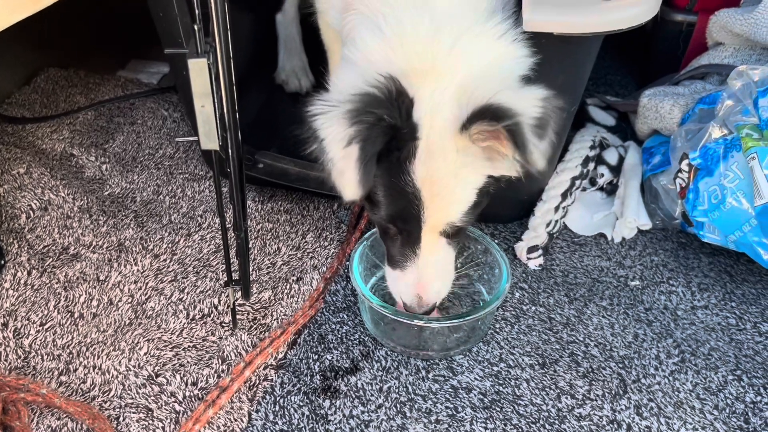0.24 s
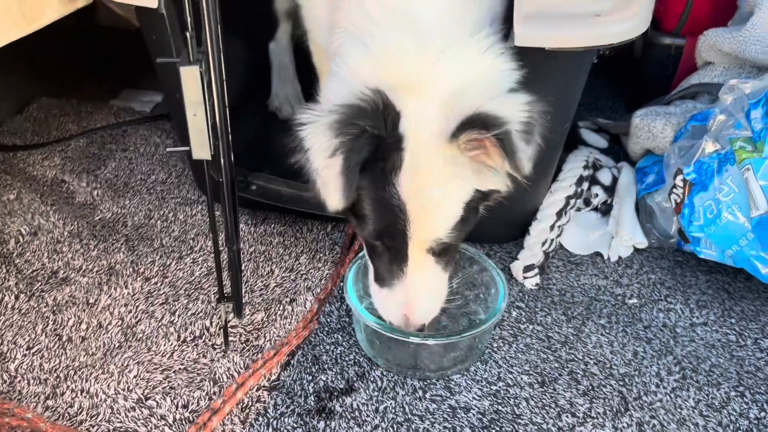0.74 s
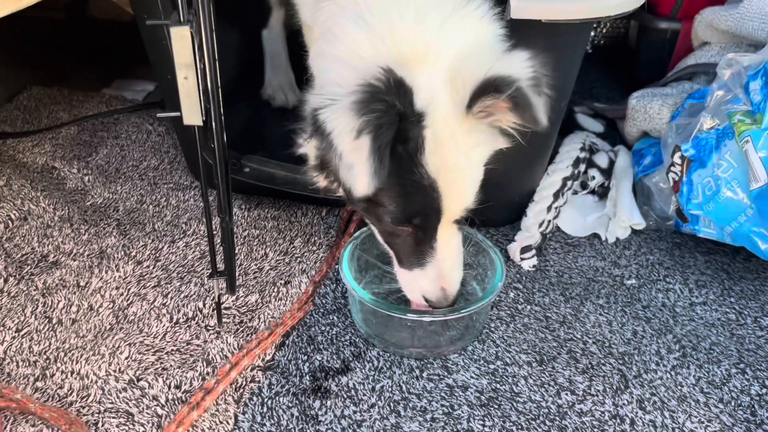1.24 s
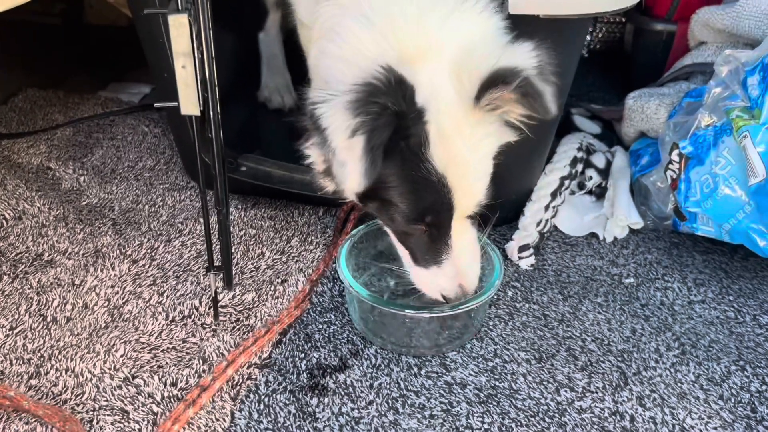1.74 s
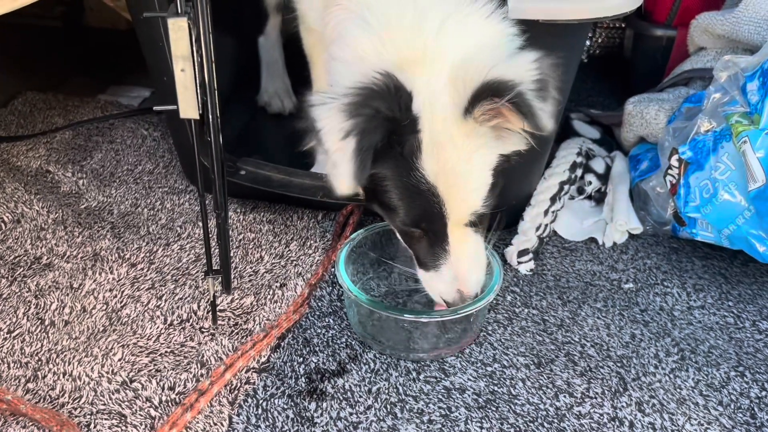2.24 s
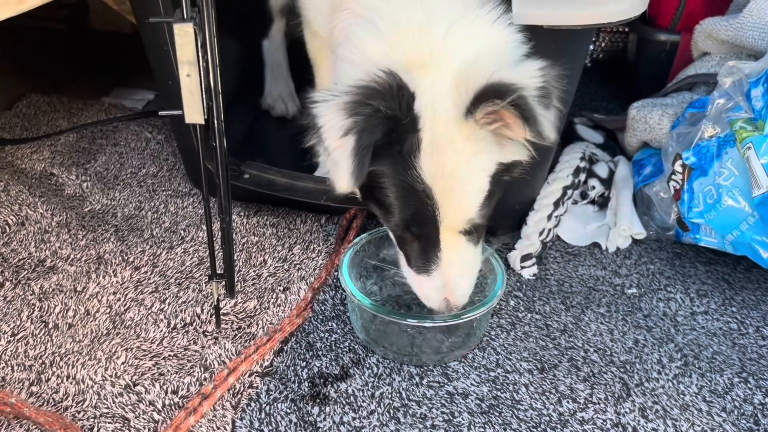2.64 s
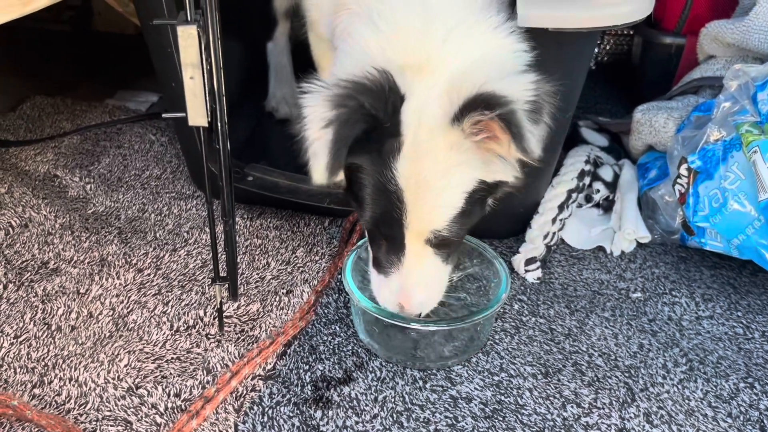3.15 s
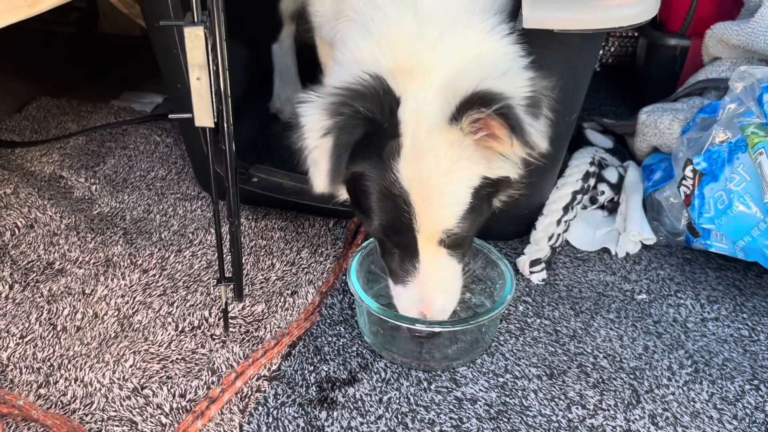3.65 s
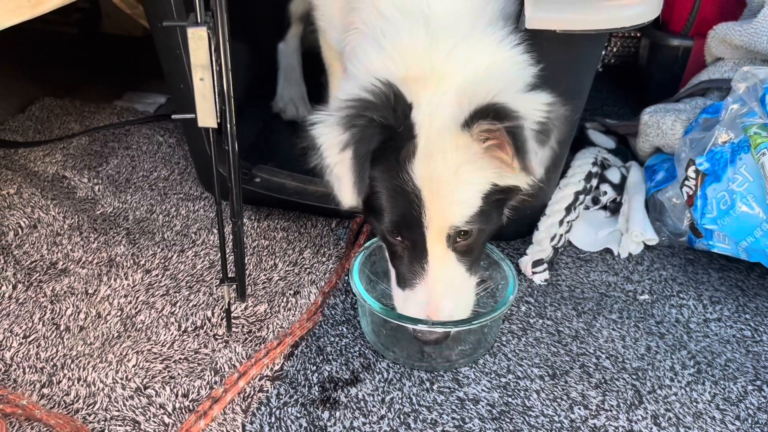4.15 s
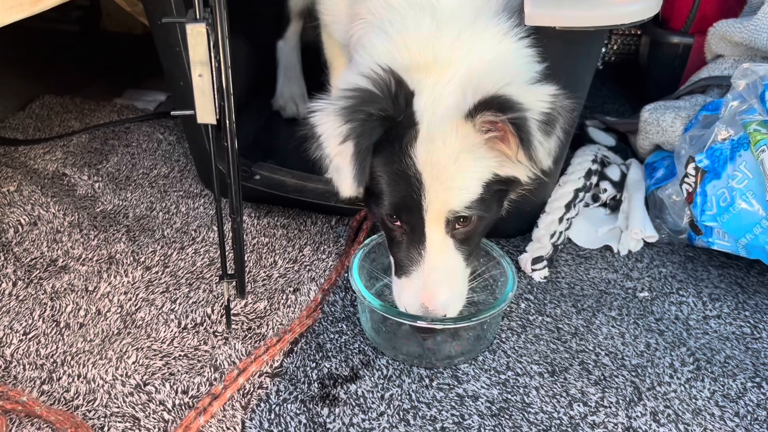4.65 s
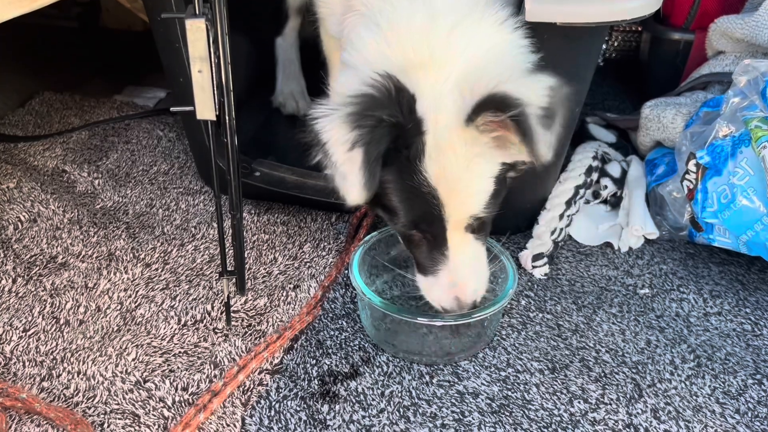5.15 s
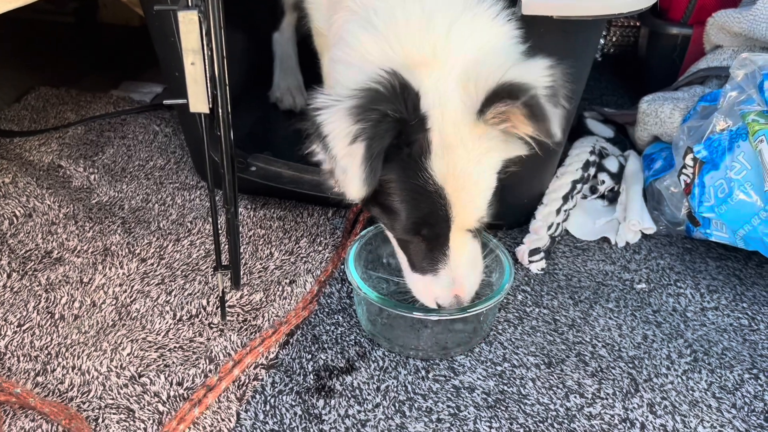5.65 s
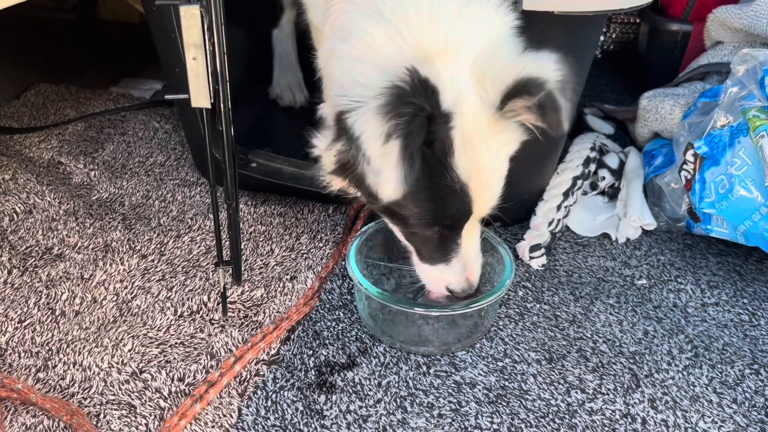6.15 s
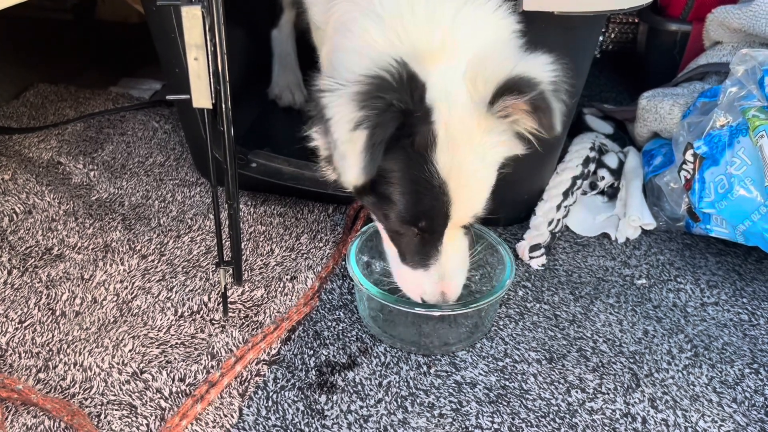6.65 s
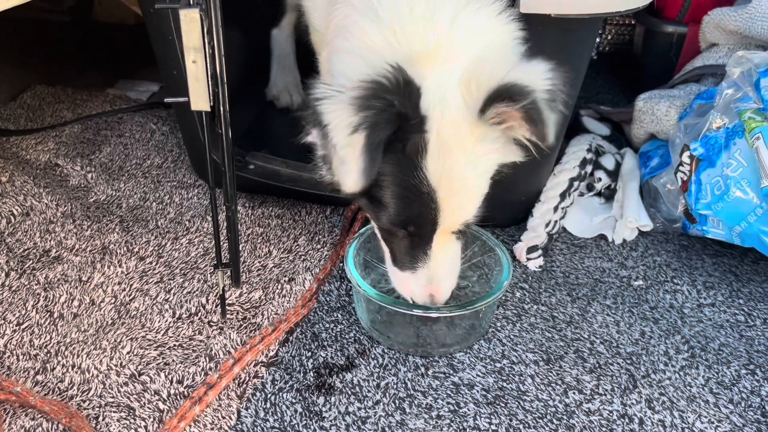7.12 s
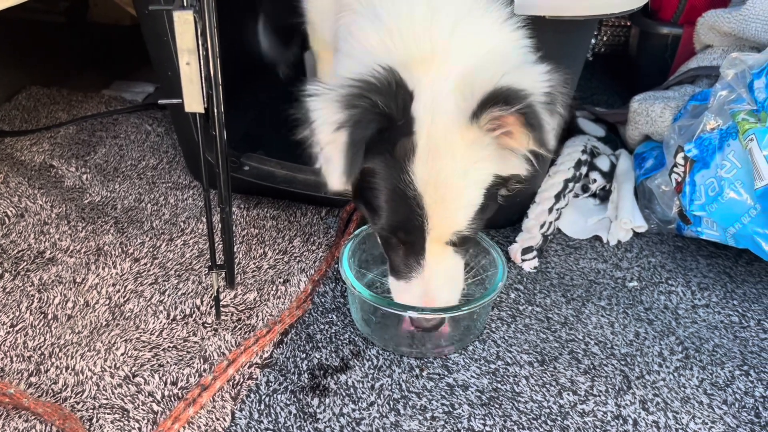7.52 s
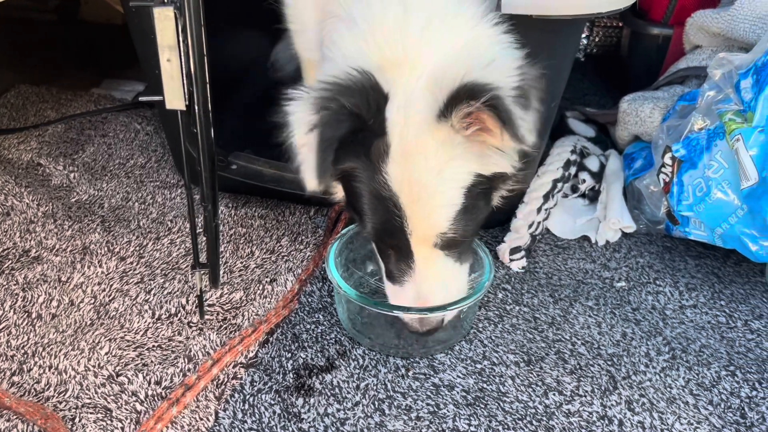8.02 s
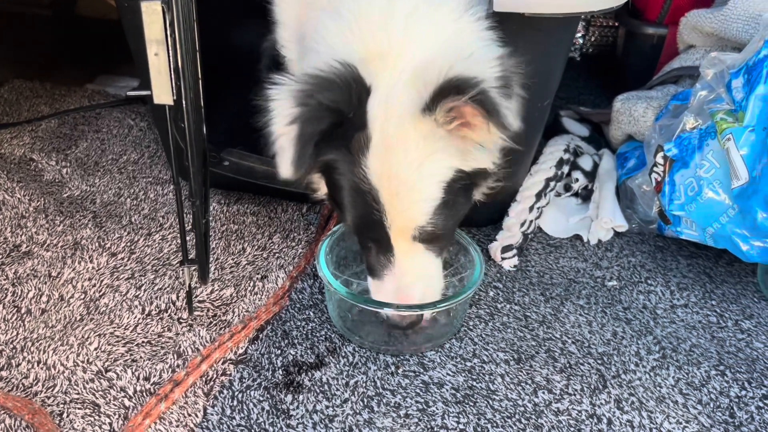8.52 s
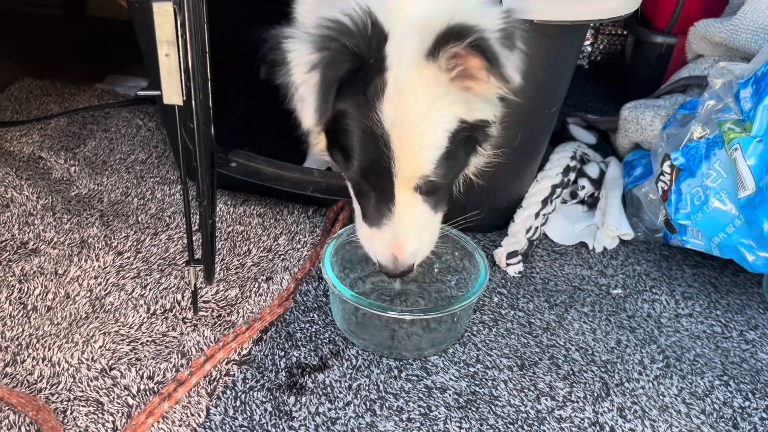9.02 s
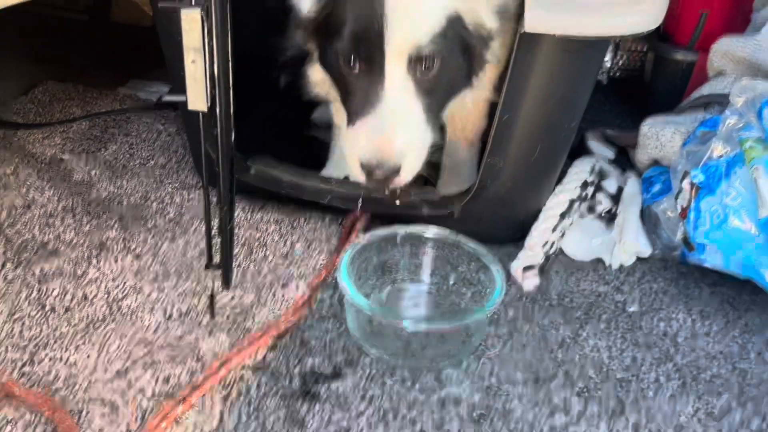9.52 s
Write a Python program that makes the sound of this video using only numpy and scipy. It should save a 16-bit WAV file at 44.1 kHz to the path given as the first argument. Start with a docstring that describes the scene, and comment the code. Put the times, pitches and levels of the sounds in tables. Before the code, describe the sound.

Steady wet lapping runs throughout, quick and slightly uneven: hollow mid-pitched plops, sharp sticky clicks and a fizzy spray of droplets in a small glass bowl. Soft squelching fills the gaps. A dull bump of the bowl comes early and a deeper one late. Behind it sits a soft low engine-like hum with rumble and a faint whine. Close stereo microphone, slightly dulled on top, in a small carpeted cabin.

```python
"""Vehicle cabin: a dog laps water from a glass bowl on the carpet, about three laps a second.
In each lap trapped air plops (swelling sines), tongue and lips smack (noise cracks with short rings)
and a spray of tiny bubbles crackles (many damped sines and noise bursts); the bowl adds its ring.
The cabin booms with a low wavering hum over rumble and a faint hiss; its close, padded walls
give only a short answer (decaying noise echo)."""
import sys
import numpy as np
from scipy import signal
from scipy.fft import rfft, irfft, next_fast_len
from scipy.io import wavfile
from scipy.ndimage import map_coordinates

SR = 44100
rng = np.random.default_rng(int(sys.argv[2]) if len(sys.argv) > 2 else 0)


def to_wav(sig):
    """Store sig (one row per channel, or 1-D mono) as 16-bit WAV at the path in sys.argv[1].

    Samples outside -1..1 are clipped; the rate is SR.
    """
    pcm = np.clip(np.atleast_2d(sig), -1, 1) * 32767
    pcm = np.round(pcm).astype(np.int16)
    wavfile.write(sys.argv[1], SR, pcm.T)  # frames by channels


N = 431298

# tongue strokes: start_s, end_s, strength_db
STROKES = [(0.195, 0.213, -49), (0.301, 0.381, -55), (0.563, 0.694, -52.5), (0.821, 1.017, -55),
           (1.272, 1.399, -50), (1.562, 1.708, -50.5), (1.875, 2.028, -53.5), (2.267, 2.408, -49),
           (2.553, 2.733, -55), (2.992, 3.136, -53.5), (3.33, 3.456, -53.5), (3.606, 3.743, -52.5),
           (3.998, 4.153, -57), (4.361, 4.579, -66.5), (4.793, 4.955, -62.5), (5.171, 5.356, -52.5),
           (5.491, 5.636, -52.5), (5.801, 5.963, -52.5), (6.181, 6.344, -49.5), (6.497, 6.637, -52),
           (6.831, 6.983, -55.5), (7.227, 7.375, -57.5), (7.539, 7.698, -57.5), (7.838, 8.019, -59),
           (8.246, 8.419, -55.5), (8.501, 8.763, -61.5), (8.921, 9.082, -58.5), (9.278, 9.497, -59),
           (9.636, 9.783, -63)]
# loud air pockets closing in the water: start_s, level_db, pitch_hz, swell_s
AIR_POCKETS = [(0.1913, -35.5, 906, 0.003), (0.3998, -38.5, 850, 0.0015), (0.5788, -18, 504, 0.0024),
               (0.9133, -35, 423, 0.0025), (1.2857, -30.5, 610, 0.0027), (1.6703, -31, 918, 0.003),
               (1.9145, -26, 533, .0021), (2.312, -32.5, 594, .0015), (2.3259, -35.5, 640, .0013),
               (2.6131, -24.5, 460, 0.0025), (3.0407, -36, 630, .0036), (3.3311, -24, 606, 0.0016),
               (3.6422, -27, 594, 0.0015), (4.0621, -34.5, 407, 0.0026), (5.2399, -36, 674, 0.0023),
               (5.5327, -23, 565, 0.0018), (5.606, -32.5, 950, 0.0013), (5.6308, -36, 930, 0.0014),
               (5.6471, -36.5, 880, .0022), (5.833, -23.5, 553, 0.0022), (5.887, -33.5, 730, 0.0016),
               (5.984, -35.5, 830, 0.0015), (6.2567, -38, 577, 0.0012), (6.5382, -23.5, 810, 0.001),
               (6.8505, -32.5, 600, 0.0019), (7.171, -37.5, 860, 0.0009), (7.269, -38.5, 720, .0027),
               (7.5875, -39.5, 444, 0.0041), (7.7891, -34.5, 710, 0.0008), (8.289, -34.5, 313, 0.0023),
               (8.2975, -32, 725, 0.0027), (8.3118, -26, 530, 0.0016), (8.6035, -38.5, 553, 0.0035)]
USUAL_STROKE_DB = -55


def plops(glide=0.1, slap_db=2.0, slap_peak_s=0.0016):
    """A trapped air pocket rings for a few cycles while the water slaps shut over it."""
    start_s, level_db, pitch_hz, swell_s = np.vstack([AIR_POCKETS, drips()]).T[:, :, None]
    t = np.arange(SR // 20) / SR
    gliding_hz = pitch_hz * (1 + glide * np.tanh(t / swell_s / 2 - 0.7))
    turns = np.cumsum(gliding_hz, axis=1) / SR
    pocket = amp(level_db) * swell(t, swell_s) * np.sin(2 * np.pi * turns)
    grit = rng.standard_normal((len(start_s), len(t)))
    slap = amp(level_db + slap_db) * swell(t, slap_peak_s) * grit
    # freq_hz, gain_db
    slap_colour = [(120, -17.5), (300, 7.5), (500, 2), (950, 10.0), (1500, -18.5), (3000, -17.0),
                   (8000, -40.0)]
    return placed(start_s, pocket) + coloured(placed(start_s, slap), slap_colour)


def drips(over_stroke_db=10.5, vary_db=4, centre_hz=864, spread=0.18, swell_s=0.0011):
    """Small plops as lifted water falls back near each stroke's end: rows as in AIR_POCKETS."""
    lag_s, scatter_s = -0.0041, 0.022
    _, end_s, strength_db, when, size, pitch = each_stroke(count=2)
    start_s = end_s + lag_s + scatter_s * when
    level_db = strength_db + over_stroke_db + vary_db * size
    pitch_hz = centre_hz * np.exp(spread * pitch)
    return np.column_stack([start_s, level_db, pitch_hz, np.full(len(start_s), swell_s)])


def smacks(ring_gain_db=1, ring_peak_s=0.0012, crack_peak_s=0.0015, jitter=0.25):
    """A wet film snaps with a broad crack and rings the small, unsteady cavity behind it."""
    # loud films at tongue and lips: start_s, ring_db, ring_hz, crack_db
    loud_films = [(0.2025, -31.5, 1430, -49), (0.212, -33.5, 1740, -43), (0.3197, -45, 3200, -36),
                  (0.5644, -43.5, 2670, -39), (0.5782, -37.5, 3310, -28), (0.599, -37, 5930, -31.5),
                  (0.651, -36, 1444, -40), (0.9186, -41.5, 7600, -51), (1.0156, -43.5, 1726, -35),
                  (1.5758, -33.5, 2656, -28), (1.9053, -45.5, 4720, -33.5), (1.9139, -28, 3360, -18),
                  (2.018, -39.5, 4120, -47), (2.177, -51, 1570, -48.5), (2.2733, -28.5, 2660, -28),
                  (2.2898, -36, 2460, -43), (2.3909, -36, 5420, -39), (2.6048, -40, 3710, -26.5),
                  (2.9979, -32, 3515, -23.5), (3.2795, -39, 4720, -46), (3.3313, -47, 1410, -41.5),
                  (3.4374, -41, 2620, -36.5), (3.605, -38.5, 2310, -43), (3.973, -51, 2800, -42),
                  (4.077, -40.5, 2350, -61), (4.366, -48, 2730, -48.5), (4.8295, -42, 2840, -46),
                  (5.1878, -39, 1850, -31), (5.5107, -35, 2490, -55.5), (5.5325, -28, 3650, -26.5),
                  (5.6306, -37.5, 1840, -51), (5.843, -35, 2530, -33.5), (6.3489, -36, 2480, -45),
                  (6.4997, -34.5, 6160, -29), (6.5368, -34, 3940, -38), (6.5488, -41, 2580, -39.5),
                  (6.7698, -46, 1500, -55), (7.95, -43, 5460, -36), (8.252, -35, 2680, -55),
                  (8.2596, -26.5, 2380, -62), (8.311, -39.5, 2600, -44.5), (8.3916, -37, 3240, -35),
                  (8.716, -35.5, 2170, -45), (9.2855, -46, 2200, -36.5), (9.4147, -38.5, 1920, -50),
                  (9.513, -42, 1435, -59)]
    start_s, ring_db, ring_hz, crack_db = np.vstack([loud_films, soft_smacks()]).T[:, :, None]
    t = np.arange(SR // 30) / SR
    grit, drift = rng.standard_normal((2, len(start_s), len(t)))
    turns = np.cumsum(ring_hz * (1 + jitter * drift), axis=1) / SR
    ring = amp(ring_db + ring_gain_db) * swell(t, ring_peak_s) * np.sin(2 * np.pi * turns)
    crack = amp(crack_db) * swell(t, crack_peak_s) * grit
    # freq_hz, gain_db
    crack_colour = [(200, -9.5), (800, -1), (1300, -1.5), (2600, -6.0), (3700, -1.0), (4600, -1.5),
                    (7000, -4), (15000, -8.5)]
    return placed(start_s, ring) + coloured(placed(start_s, crack), crack_colour)


def soft_smacks(vary_db=4, ring_over_db=4, crack_over_db=4, centre_hz=2465, spread=0.55):
    """Small films snapping anywhere within each stroke: rows start_s, ring_db, ring_hz, crack_db."""
    start_s, end_s, strength_db, when, size, pitch = each_stroke(count=6)
    snap_s = start_s + (end_s - start_s) * (1 + when) / 2
    level_db = strength_db + vary_db * size
    ring_hz = centre_hz * np.exp(spread * pitch)
    return np.column_stack([snap_s, level_db + ring_over_db, ring_hz, level_db + crack_over_db])


def spray(clump_db=3):
    """Tiny bubbles ping and films of saliva crackle in clumps over a thin wet hiss."""
    # freq_hz, gain_db
    spray_colour = [(300, -18.5), (900, -22), (1500, -0.5), (2500, 3.5), (3600, 2.5), (4600, 2), (6500, 3),
                    (8000, -1), (15000, 2)]
    pings = bubbles(centre_hz=2945, spread=0.5, life_s=0.0011, size_db=8.0, count=9000)
    mist = bubbles(centre_hz=8330, spread=0.35, life_s=0.00074, size_db=11.0, count=2400)
    snaps = crackle(peak_s=0.0013, size_db=4.5, count=2000)
    fizz = amp(-15) * rng.standard_normal(N)
    strength_db = np.array(STROKES)[:, 2]
    flow = stirring(strength_db, lead_s=0.0046, trail_s=0.017) * amp(clump_db * wobble(45))
    mix = amp(-6.0) * pings + amp(-5.0) * mist + amp(-7.0) * snaps + fizz
    return coloured(flow * mix, spray_colour)


def slosh(usual_db=-53.5, db_per_effort_db=0.56):
    """Larger bubbles gurgle in water that churns against the glass."""
    gurgle = bubbles(centre_hz=797, spread=0.24, life_s=0.0019, size_db=6.5, count=2000)
    # freq_hz, gain_db
    churn_colour = [(150, -9.0), (300, -7.5), (900, 0.0), (1500, -7.5), (3000, -19.5)]
    churn = unit(coloured(crackle(peak_s=0.0024, size_db=10.5, count=1500), churn_colour))
    stroke_db = usual_db + db_per_effort_db * effort_db()
    stirred = np.hypot(stirring(stroke_db, lead_s=0.0025, trail_s=0.031), wash())
    return stirred * (amp(-3.0) * gurgle + amp(-11.0) * churn)


def wash(under_plop_db=-27, decay_s=0.027):
    """How hard the water churns on after the loud plops; their powers add."""
    start_s, level_db, *_ = np.transpose(AIR_POCKETS)[:, :, None]
    t = np.arange(SR // 4) / SR
    churning = amp(level_db + under_plop_db) * np.exp(-t / decay_s)
    return np.sqrt(placed(start_s, churning ** 2))


def mouth(usual_db=-66, db_per_effort_db=0.45, lag_s=0.08):
    """Under and between the strokes, soft wet squelching of saliva and films wavers in level."""
    # freq_hz, gain_db
    mouth_colour = [(400, -19.5), (900, 8.5), (1200, -6), (1900, 2), (2800, -3.5), (3800, -4), (5000, -8),
                    (7500, -5), (15000, -30.5)]
    end_s = np.array(STROKES)[:, 1]
    squelch_db = usual_db + db_per_effort_db * effort_db()
    level_db = curves(np.column_stack([end_s + lag_s, squelch_db]))[0]
    level = amp(level_db + 6.3 * wobble(22))
    saliva = bubbles(centre_hz=1800, spread=0.45, life_s=0.0009, size_db=4, count=4000)
    films = crackle(peak_s=0.0014, size_db=5, count=1800)
    return coloured(level * (saliva + films) / 2, mouth_colour)


def bowl(x, direct_db=0.23):
    """The water's sound plus the glass's short resonances, damped by the water."""
    # resonances of the glass: mode_hz, width_hz, gain_db
    glass_modes = [(1588, 50, -5.5), (2560, 200, -13), (3560, 320, -5.5), (5130, 220, -9.5),
                   (7750, 140, -6.5), (12180, 200, -11)]

    def response(f):
        ring = sum(amp(gain_db) * 1j * f * width_hz / (mode_hz ** 2 - f * f + 1j * f * width_hz)
                   for mode_hz, width_hz, gain_db in glass_modes)
        return amp(direct_db) + ring

    return filtered(x, response)


def thumps(peak_s=0.012):
    """The muzzle pushes the bowl; the floor gives under it with a few slow cycles."""
    # pushes: start_s, level_db, pitch_hz
    pushes = [(.235, -28.5, 105), (0.902, -48, 81), (8.307, -18.5, 60)]
    start_s, level_db, pitch_hz = np.transpose(pushes)[:, :, None]
    t = np.arange(SR // 4) / SR
    return placed(start_s, amp(level_db) * swell(t, peak_s) * np.sin(2 * np.pi * pitch_hz * t))


def walls(x):
    """A short dense echo off padded walls: decaying noise, different at each port."""
    # decay of the echo: freq_hz, t60_s
    wall_decay = [(150, 0.041), (800, 0.07), (3000, 0.047), (12000, 0.0067)]
    hz, t, z = signal.stft(rng.standard_normal((2, SR // 5)), SR, nperseg=256)
    decay = amp(-60 * t / along(wall_decay, hz)[:, None])
    tail = signal.istft(z * decay, SR, nperseg=256)[1]
    tail = np.pad(tail, ((0, 0), (SR // 300, 0)))  # gap before the echo
    return signal.fftconvolve(x[None], tail / np.linalg.norm(tail[0]), axes=1)[:, :N]


def cabin():
    """A wavering boom, weaker hums and a faint machine whine over rumble and a soft broad hiss."""
    # boom level: time_s, level_db
    boom_level = [(0, -43.5), (.9, -37), (4.4, -35.5), (5, -39.5), (7.8, -44), (9.78, -44)]
    # whine level: time_s, level_db
    whine_level = [(0, -69.5), (3.6, -60.5), (5.15, -60), (5.4, -68), (9.78, -71)]
    # hiss level, swelling briefly near the start: time_s, level_db
    hiss_level = [(0, -75.5), (.5, -54), (1.2, -59), (1.6, -71.5), (4, -88), (8.5, -74.5), (9.78, -63)]
    # rumble spectrum: freq_hz, density_db
    rumble_colour = [(20, -16.5), (40, -7.5), (60, 3.5), (85, -2), (120, -3.5), (200, -16.5), (350, -18.5),
                     (600, -20.5), (950, -26.5), (1200, -25.5), (2000, -54.5), (3200, -58.5), (8000, -64)]
    # hiss spectrum: freq_hz, density_db
    hiss_colour = [(300, -15.5), (1300, 11), (2300, -3), (3200, -8.5), (7000, -13), (15000, -24)]
    t = np.arange(N) / SR
    # boom and whine sink slowly in pitch
    boom_hz = 70 - 0.35 * t + 1.212 * wobble(11)
    boom = amp(curves(boom_level)[0] + 3.1 * wobble(16)) * tone(boom_hz)
    whine_hz = 357 - 2.7 * t + 0.87 * wobble(14)
    whine = amp(curves(whine_level)[0] + 0.68 * wobble(4.9)) * tone(whine_hz)
    rumble = amp(-43.5 + wobble(4)) * noise(rumble_colour)
    hiss = amp(curves(hiss_level)[0]) * noise(hiss_colour)
    lean = [(150, 2.8), (500, 0)]  # freq_hz, left_minus_right_db
    lead = [(0, 0.018)]  # freq_hz, left_lead_rad
    return between_ports(boom + drones() + whine + rumble, lean, lead) + hiss


def drones(waver_hz=1.175):
    """Weaker low hums, each slightly unsteady in pitch, that beat against the boom."""
    # hums: pitch_hz, level_db
    hums = [(57, -51), (78.5, -45.5), (98, -53.5)]
    return sum(amp(level_db) * tone(pitch_hz + waver_hz * wobble(6)) for pitch_hz, level_db in hums)


def noise(spectrum):
    """Stereo noise of rms 1; mid and side shares set the left-right likeness by frequency."""
    # noise at the two ports: freq_hz, left_right_correlation
    likeness = [(60, 0.84), (150, 0.95), (380, 0.59), (950, 0.081), (2400, 0.067), (15000, 0.17)]

    def shares(hz):
        turn = np.arccos(np.clip(along(likeness, hz), -1, 1)) / 2
        return amp(along(spectrum, hz)) * [np.cos(turn), np.sin(turn)]

    mid, side = filtered(rng.standard_normal((2, N)), shares)
    return unit(np.array([mid + side, mid - side]))


def tone(hz):
    """A sine of rms 1 that follows a pitch curve."""
    return unit(np.sin(2 * np.pi * np.cumsum(hz) / SR))


def bubbles(centre_hz, spread, life_s, size_db, count):
    """Short damped sines, rms 1; the tongue and shallow water stop each bubble quickly."""
    starts_s, size = scatter(size_db, count)
    pitch, life, glide = rng.standard_normal((3, count, 1))
    hz = np.clip(centre_hz * np.exp(spread * pitch), 250, 15000)
    t = np.arange(SR // 80) / SR
    age = t / (life_s * np.exp(0.71 * life))
    turns = np.cumsum(hz * (1 + 0.064 * glide * np.tanh(age / 2)), axis=1) / SR
    fade = 1 - t / t[-1]
    waves = swell(age, 1) * np.sin(2 * np.pi * turns) * fade
    return unit(placed(starts_s, size[:, None] * waves))


def crackle(peak_s, size_db, count):
    """Snapping films, rms 1; the bowl smears each snap into its own short noise burst."""
    starts_s, size = scatter(size_db, count)
    t = np.arange(SR // 80) / SR
    bursts = swell(t, peak_s) * rng.standard_normal((count, len(t)))
    return unit(placed(starts_s, size[:, None] * bursts))


def scatter(size_db, count):
    """Random moments over the whole time, with gains of which a few stand out."""
    starts_s = (np.arange(count) + 6 * rng.random(count)) / count * N / SR
    return starts_s, amp(size_db * np.minimum(rng.exponential(size=count), 3))


def stirring(levels_db, lead_s, trail_s, sag_db_per_s=14):
    """Water motion: builds before each stroke, sags from the tongue's entry, then trails off."""
    t, power = np.arange(N) / SR, np.zeros(N)
    for (start_s, end_s, _), level_db in zip(STROKES, levels_db):
        span = slice(max(0, int((start_s - 0.5) * SR)), int((end_s + 0.5) * SR))
        near = t[span]
        outside = np.maximum(start_s - near, 0) / lead_s + np.maximum(near - end_s, 0) / trail_s
        sagging_db = level_db - sag_db_per_s * (near - (start_s + end_s) / 2)
        power[span] += amp(sagging_db) ** 2 * np.exp(-2 * outside)
    return np.sqrt(power)


def effort_db():
    """How much stronger than usual each stroke is."""
    return np.array(STROKES)[:, 2] - USUAL_STROKE_DB


def each_stroke(count):
    """start_s, end_s, strength_db, count times over, with chance (-1 to 1) for time, size, pitch."""
    strokes = np.repeat(STROKES, count, axis=0)
    return (*strokes.T, *rng.uniform(-1, 1, (len(strokes), 3)).T)


def swell(t, peak_s):
    """Rises from 0 to 1 at peak_s, then dies away."""
    return t / peak_s * np.exp(1 - t / peak_s)


def placed(starts_s, waves):
    """Sum rows of short waves, each at its start time."""
    first = (np.maximum(starts_s, 0) * SR).astype(int).reshape(-1, 1)
    index = first + np.arange(waves.shape[1])
    return np.bincount(index.ravel(), waves.ravel(), N)[:N]


def between_ports(x, balance, lead):
    """Share a level difference and a phase lead equally between left and right."""
    sides = np.array([[1], [-1]]) / 2

    def response(hz):
        return amp(sides * along(balance, hz)) * np.exp(1j * sides * along(lead, hz))

    return filtered(x, response)


def coloured(x, spectrum):
    """x through a (freq_hz, gain_db) spectrum."""
    return filtered(x, lambda hz: amp(along(spectrum, hz)))


def filtered(x, response):
    """x times a complex response of frequency."""
    m = next_fast_len(N + SR // 2)
    return irfft(rfft(x, m) * response(np.fft.rfftfreq(m, 1 / SR)), m)[..., :N]


def along(points, hz):
    """Interpolate (freq_hz, value) points on a log axis."""
    f, v = np.transpose(points)
    return np.interp(np.log(hz + 1), np.log(f + 1), v)


def curves(rows):
    """One value per sample for each column after the time."""
    time_s, *cols = np.transpose(rows)
    return [np.interp(np.arange(N) / SR, time_s, c) for c in cols]


def wobble(rate_hz):
    """A smooth random curve, rate_hz knots a second."""
    knots = rng.standard_normal(int(N * rate_hz / SR) + 4)
    return map_coordinates(knots, [np.arange(N) * rate_hz / SR])


def amp(db):
    """Decibels to gain."""
    return 10 ** (np.asarray(db) / 20)


def unit(x):
    """Scale to rms 1."""
    return x / np.sqrt(np.mean(x ** 2) + 1e-20)


def scene():
    """The drinking dog and its bowl inside the humming cabin."""
    # bowl at the two ports: freq_hz, left_minus_right_db
    bowl_balance = [(100, 3), (300, 1), (700, -2.5), (1300, -2), (2400, -.5), (8000, 0)]
    # bowl at the two ports: freq_hz, left_lead_rad
    bowl_lead = [(150, 0), (500, -.45), (2000, .2), (3000, 1), (4300, .4), (5800, -.3), (7400, 0),
                 (9000, -2.7), (12000, -5.8), (16000, -9.5)]
    water = bowl(plops() + smacks() + spray() + slosh() + mouth())
    echo = amp(-10) * walls(water)
    return between_ports(water + thumps(), bowl_balance, bowl_lead) + echo + cabin()


def record(dry, top_hz=15900):
    """The microphone colours the spectrum with several dips and a steep band limit."""
    # microphone response: freq_hz, gain_db
    mic_colour = [(950, 1), (1150, -7.5), (1350, -3), (1600, 0), (7800, -2.5), (9000, 0), (10000, -12),
                  (11200, -6), (12300, -5), (14500, -8.5), (16000, -6)]
    return filtered(dry, lambda hz: amp(along(mic_colour, hz)) * (hz < top_hz))


dry = scene()
out = record(dry)
to_wav(out)
```